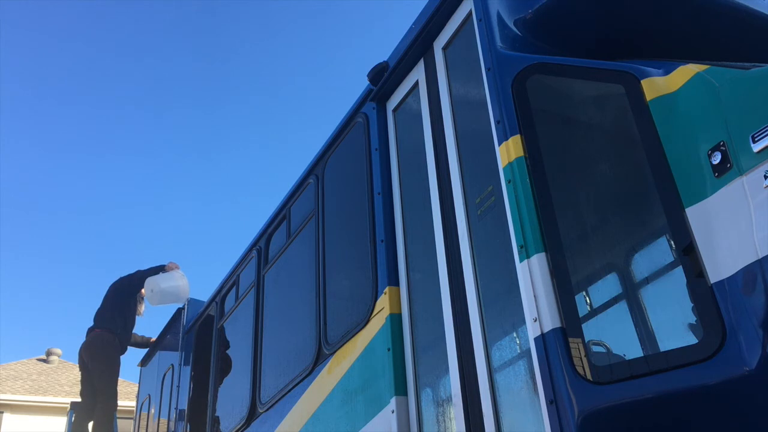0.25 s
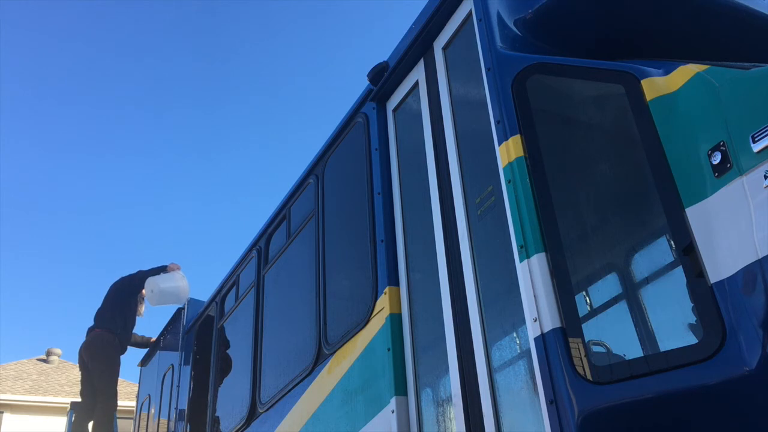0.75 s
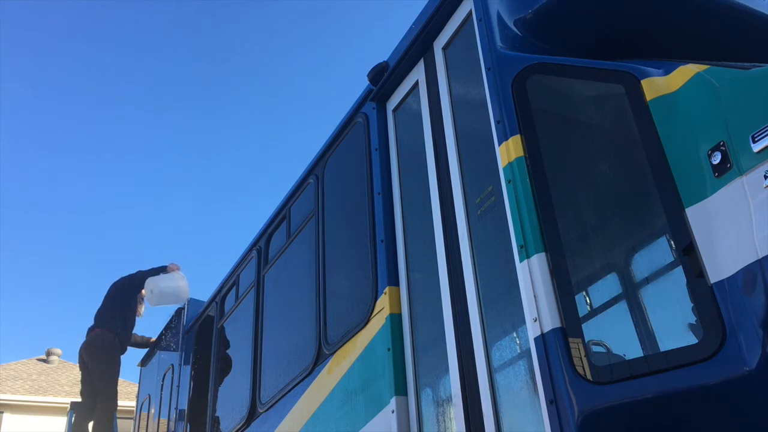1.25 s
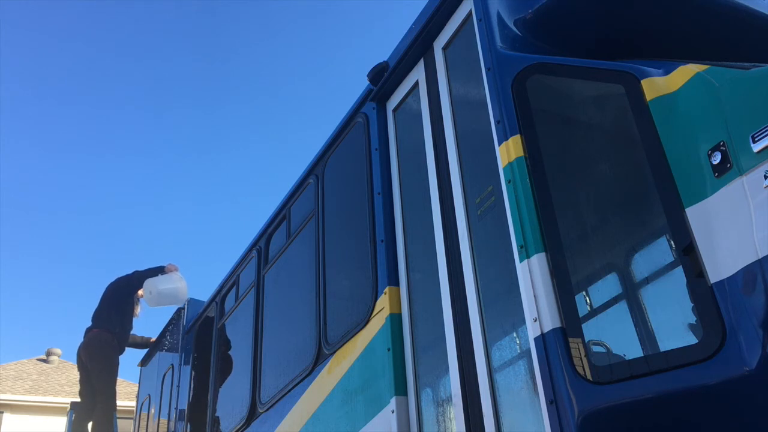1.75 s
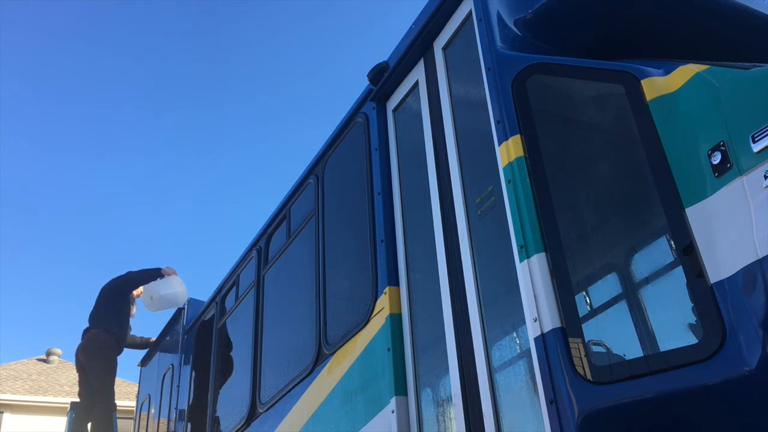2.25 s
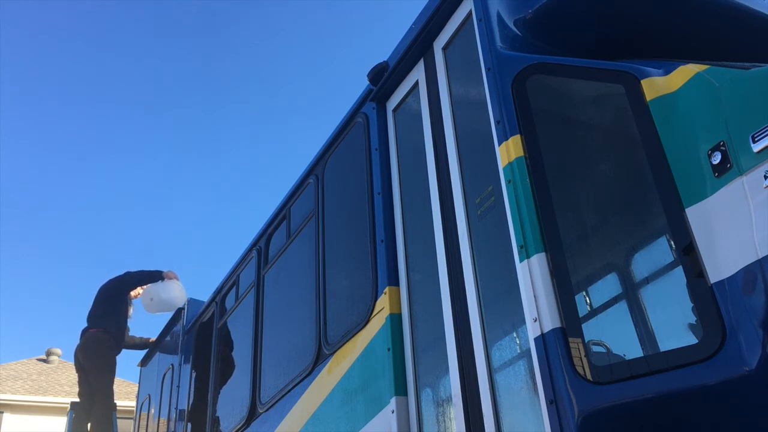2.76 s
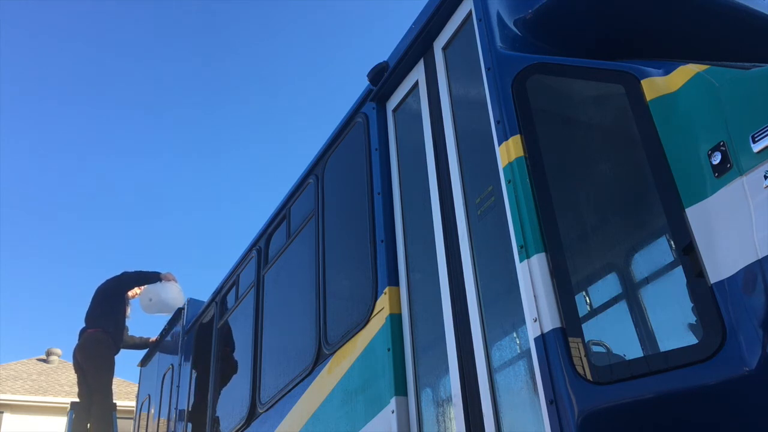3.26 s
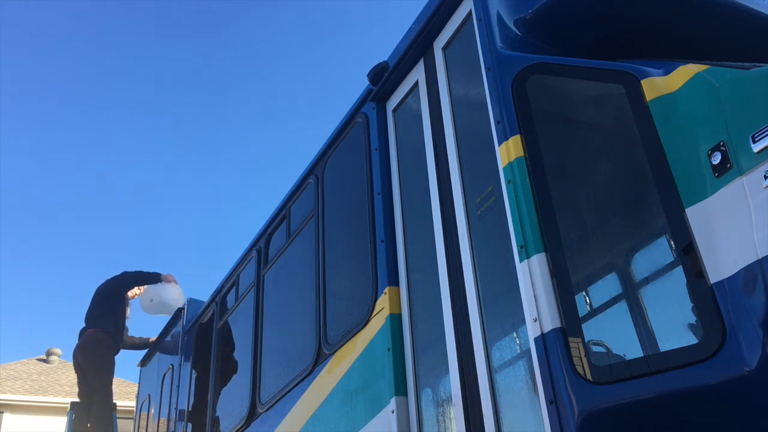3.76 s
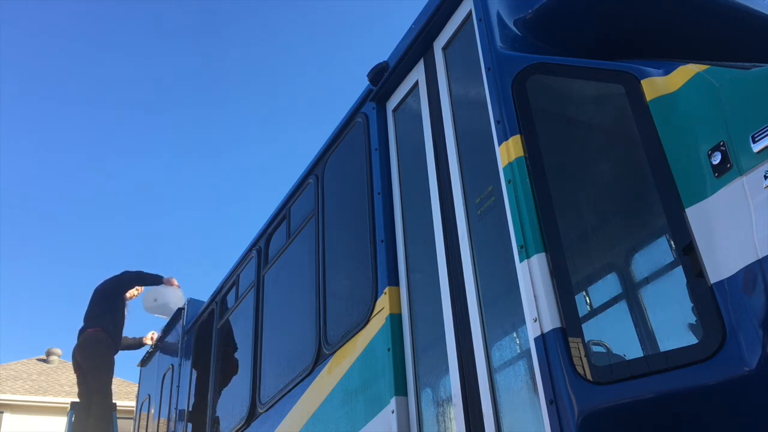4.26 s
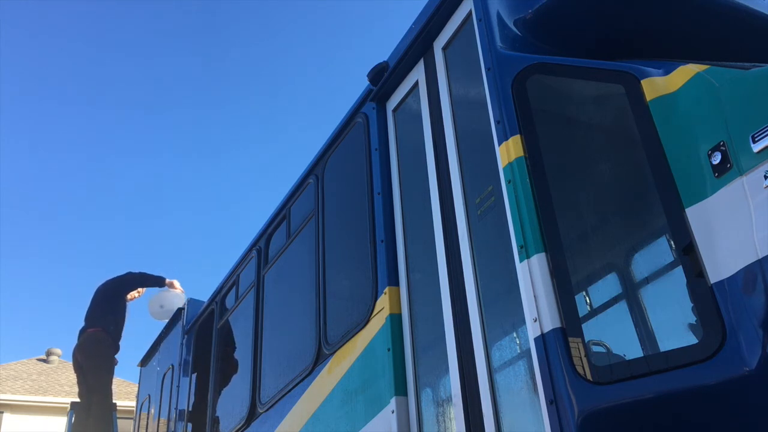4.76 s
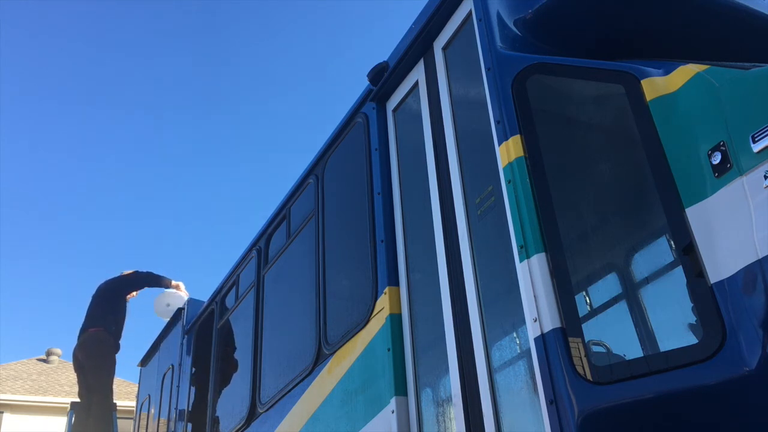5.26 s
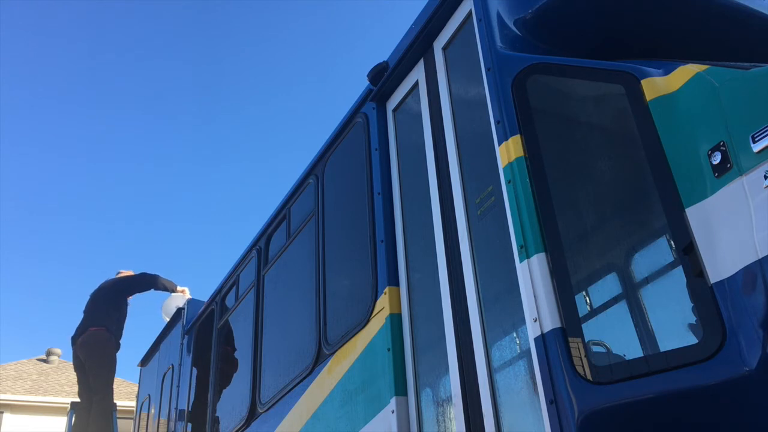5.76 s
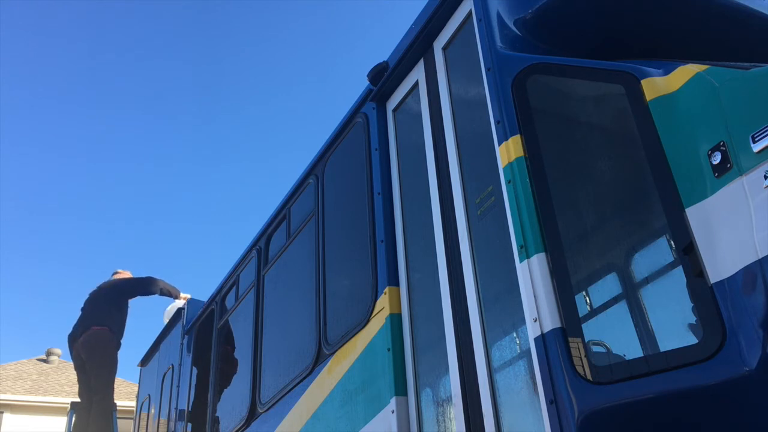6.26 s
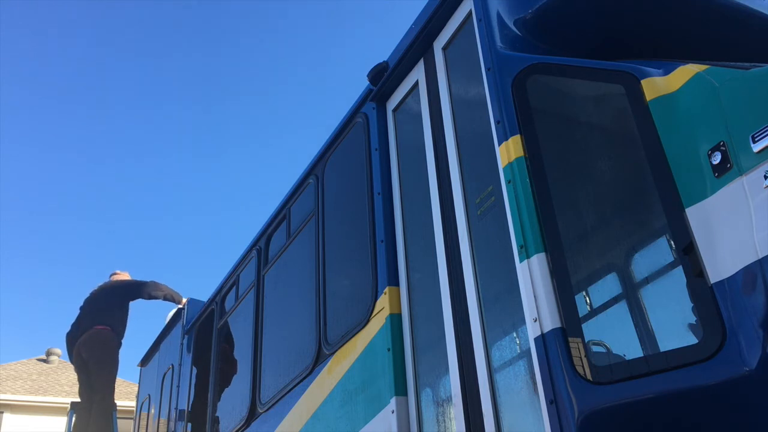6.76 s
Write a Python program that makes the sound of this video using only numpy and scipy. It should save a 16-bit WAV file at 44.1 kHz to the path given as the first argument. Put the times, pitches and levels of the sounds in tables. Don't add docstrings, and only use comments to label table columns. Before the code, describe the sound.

A quiet yard with low distant traffic hum and faint steady air hiss. From 0 to 1.2 s only small, crisp water drips tick irregularly close by, with a very faint sparrow chirp at 0.75. At 1.3 a small splash slaps sheet metal; from 1.7 to 2.4 a fuller throw lands as uneven slaps, with short metallic rings, patter and bright fizz, a soft chirp at its start. It thins to scattered ticking drips and a chirp near 3.1. At 3.8 one hard, loudest slap cracks on the roof, followed by smaller gobs until 4.0. Drips and tiny bubble plinks continue. From 4.65 to 5.2 the last water tumbles out in a rapid cluster, pattering and gurgling, then drains quickly. Two sharp high ticks come around 5.3, then sparse drips, with faint warbled chirps at 5.7 and 6.15. Echoes are short and dull.

```python
import sys
import numpy as np
from scipy import signal
from scipy.fft import rfft, irfft
from scipy.io import wavfile
from scipy.ndimage import uniform_filter1d

SR = 44100
rng = np.random.default_rng(int(sys.argv[2]) if len(sys.argv) > 2 else 0)


def file_out(sig):
    cols = np.atleast_2d(sig).T
    lim = np.clip(cols, -1, 1)
    pcm = np.round(lim * 32767).astype(np.int16)
    wavfile.write(sys.argv[1], SR, pcm)


def gain_from_db(level_db):
    decades = np.asarray(level_db, float) / 20
    return 10 ** decades


N = 308700

# [t/s, peak level/dB, tick colour f/Hz, panel ring re peak/dB, bright spit re peak/dB]
THROWN_GOBS = [(1.293, -25.5, 3000, -8, 4), (1.3928, -40, 5840, -18, 0), (1.723, -27.5, 2430, 1.5, 5.5),
               (1.7638, -37.5, 2970, -8, -27), (1.8158, -35.5, 2800, 3, 7), (1.885, -45, 3380, 5, -16),
               (1.927, -24, 2020, -1, 0.5), (1.9713, -28, 3280, -5, -19), (2.0655, -35.5, 2430, 4.5, 2),
               (2.084, -33, 3020, 10, 1), (2.098, -50, 2960, -9.5, -20), (2.2801, -27, 3140, -1.5, -3),
               (2.3044, -30.5, 3630, -6.5, 1), (2.3589, -35.5, 2230, -17, -4),
               (3.774, -44.5, 3120, -0.5, -1), (3.8303, -15, 1970, 0, 0), (3.8796, -24, 3120, -15, -23),
               (3.9342, -34, 3930, -2.5, -1), (3.9866, -34.5, 3000, -1.5, 0), (4.0023, -36, 3000, 0, -14)]
# [t/s, peak level/dB, tick colour f/Hz, panel ring re peak/dB, bright spit re peak/dB]
LAST_GOBS = [(4.666, -34.5, 4360, -5, -15), (4.7076, -38.5, 3200, -9.5, -5),
             (4.7376, -33.5, 5230, -9.5, -3), (4.7814, -35.5, 2120, 8.5, 8), (4.812, -26, 6380, -21, -19),
             (4.8289, -24, 3120, -2, -26), (4.8448, -36, 3080, 4, -14), (4.8748, -24, 5740, -7, -23),
             (4.9338, -33.5, 6600, -1.5, -13), (5.0289, -32.5, 4300, -9, -2), (5.0858, -38, 2800, -6.5, -9),
             (5.1092, -28, 3120, -2, -8), (5.1415, -34, 3140, -6.5, -12), (5.1696, -49.5, 2110, 6, -8)]


def rms_one(x):
    return x / np.sqrt(np.mean(x ** 2) + 1e-20)


def at_hz(points, hz):
    point_hz, point_db = np.transpose(points)
    return np.interp(np.log(hz), np.log(point_hz), point_db)


def coloured(x, spectrum):
    hz = np.fft.rfftfreq(N, 1 / SR) + 1
    return rms_one(irfft(rfft(x) * gain_from_db(at_hz(spectrum, hz)), N))


def band(x, low_hz, high_hz):
    edges = np.clip([low_hz, high_hz], 20, .45 * SR)
    return signal.sosfilt(signal.butter(2, edges, "band", fs=SR, output="sos"), x)


def ring(clicks, hz, t60):
    decay = gain_from_db(-60 / (t60 * SR))
    turn = 2 * np.pi * hz / SR
    return signal.lfilter([0, np.sin(turn)], [1, -2 * decay * np.cos(turn), decay * decay], clicks + 1e-18)


def droplets(per_s, spread_db):
    sizes = gain_from_db(spread_db * np.minimum(rng.exponential(1, N), 5)) * rng.choice([-1, 1], N)
    return sizes * (rng.random(N) < per_s / SR)


def burst(t60, rise_s):
    t = np.arange(2048) / SR
    snap = 1 + 1.4 * np.exp(-t / 0.0005)
    fade = gain_from_db(-60 * t / t60) * (1 - np.exp(-t / rise_s))
    return rng.standard_normal(len(t)) * snap * fade + 6.25 * (t == 0)


def impacts():
    # [t/s, peak level/dB, tick colour f/Hz]
    run_off_drips = [(0.2768, -42.5, 4360), (0.6539, -37, 3020), (0.7971, -38.5, 4420), (1.2653, -40.5, 4180),
                     (1.5686, -35.5, 2970), (1.6404, -61, 3080), (1.7756, -25, 3850), (2.2007, -38, 3200),
                     (2.219, -36.5, 4350), (2.5479, -30.5, 3800), (2.5748, -35, 4500), (2.7272, -44.5, 3260),
                     (2.754, -53, 2070), (3.436, -47, 2530), (2.801, -30, 4100), (2.9058, -45.5, 4140),
                     (2.9635, -47.5, 4100), (3.0595, -42.5, 4530), (3.088, -36.5, 3740), (3.2949, -40.5, 3870),
                     (3.586, -42, 3670), (4.2856, -36.5, 4300), (4.354, -39.5, 3960), (4.4248, -53, 2700),
                     (5.0055, -34, 2360), (5.4935, -35.5, 2670), (5.5629, -40.5, 3760), (5.892, -39, 3450),
                     (6.0807, -51, 2740), (6.2843, -45.5, 3260),
                     (0.0181, -43.5, 5570), (0.1572, -38.5, 4800), (0.184, -37.5, 4700), (0.3594, -43, 5440),
                   (0.532, -49, 6840), (0.586, -42, 5700), (0.6739, -41, 6450), (0.6886, -40.5, 6000),
                   (0.8776, -43, 5970), (0.9268, -45, 6350), (1.5332, -46.5, 6060), (1.5988, -42, 5940),
                   (2.4646, -46, 6780), (2.627, -41, 4500), (2.7807, -47, 5630), (2.907, -38.5, 6960),
                   (3.4302, -42, 6200), (3.686, -48, 6350), (4.1529, -42.5, 6250), (4.2247, -49, 6450),
                   (4.299, -55, 6040), (4.3273, -36, 4800), (4.4714, -42, 5500), (4.5946, -52, 5850),
                   (5.0449, -32.5, 5370), (5.372, -38.5, 5500), (5.9615, -44, 5600), (6.3732, -37.5, 7140),
                   (6.4433, -46.5, 6910), (6.55, -39.5, 4660)]
    # [t/s, peak level/dB]
    beads = [(0.0014, -43.5), (0.3124, -41), (0.455, -49), (0.496, -56), (0.621, -45), (0.998, -43),
             (1.5503, -44), (2.5282, -42.5), (3.154, -38.5), (3.3318, -44), (3.483, -44), (4.1279, -45),
             (5.272, -23), (5.3289, -34), (5.3531, -24), (5.4616, -43.5), (5.8377, -43.5), (5.924, -58.5),
             (6.2223, -52), (6.6336, -58)]
    bead_hz, bead_spit_db = 8520, 2
    ring_db = -34
    drips = [(*row, 0) for row in run_off_drips]
    drips += [(s, db, bead_hz, bead_spit_db) for s, db in beads]
    out = THROWN_GOBS + LAST_GOBS
    for s, db, hz, extra_db in drips:
        spit_db = -14.5 + extra_db - 1.6 * (db + 46.5)
        out = out + [(s, db, hz, ring_db, spit_db)]
    return out


def panel(patter_gain, gurgle_gain):
    # [f/Hz, level/dB, t60/s]
    panel_modes = [(346, -33.5, 0.3), (470, -38, .05), (624, -32, 0.058), (720, -29, 0.02), (817, -19, 0.3),
                   (866, -11, 0.23), (884, -17, 0.3), (976, -22.5, 0.89), (1066, -12, 0.1),
                   (1176, -1.5, 0.063), (1248, -0.5, 0.055), (1331, -3.5, 0.15), (1320, -10.5, 0.033),
                   (1400, -1, 0.088), (1520, -8.5, 0.027), (1533, -6.5, 0.068), (1656, -5.5, 0.072),
                   (1617, -7, 0.12), (1830, -12, .08), (2025, -8, 0.035), (1970, -22, 0.18),
                   (2430, -17.5, 0.16), (2790, -19, 0.23), (2900, -19, .05), (3120, -5.5, .05),
                   (3140, -17, .05), (3486, -13.5, 0.13), (3780, -25, .06), (4300, -17, 0.036),
                   (4800, -26, 0.021)]
    hits = impacts()
    t = np.arange(3584) / SR
    slaps, patter = np.zeros(N + len(t)), np.zeros((2, N))

    hz, level_db, t60 = np.transpose(panel_modes)[:, :, None]
    luck = rng.standard_normal((len(hits), 3, len(panel_modes), 1))
    for (s, peak_db, _, ring_db, _), (lag, strength, detune) in zip(hits, luck):
        since = np.maximum(t - np.abs(lag) * .0025, 0)
        wave = np.sin(2 * np.pi * hz * (1 + 0.0072 * detune) * since)
        modes = gain_from_db(level_db + 2.3 * strength - 60 * since / t60) * wave
        blow = (np.sign(lag) * modes).sum(axis=0)
        i = round(s * SR)
        slaps[i:i + len(t)] += gain_from_db(peak_db + ring_db + 2.5) * blow / np.abs(blow).max()
    slaps = band(slaps, 1100, 8600)

    clumps = gain_from_db(1.3 * rms_one(uniform_filter1d(rng.standard_normal(N), size=700)))
    for hz, level_db, t60 in panel_modes:
        struck = ring(clumps * droplets(per_s=2400.0, spread_db=1.5), hz, 0.3 * t60) / np.sqrt(t60)
        patter[int(hz < 750)] += gain_from_db(level_db) * struck
    high_patter, low_gurgle = rms_one(patter[0]), rms_one(patter[1])
    return slaps[:N] + patter_gain * high_patter + gain_from_db(-2.5) * gurgle_gain * low_gurgle


def sheets():
    rise_s, t60_s = .012, 0.33
    t, starts = np.arange(SR // 2) / SR, np.zeros(N)
    for s, peak_db, _, ring_db, _ in THROWN_GOBS + LAST_GOBS:
        starts[round(s * SR)] = gain_from_db(peak_db + ring_db)
    spreading = (1 - np.exp(-t / rise_s)) * gain_from_db(-60 * t / t60_s)
    return signal.fftconvolve(starts, spreading)[:N]


def ticks():
    out, t = np.zeros(N + 4096), np.arange(2048) / SR
    for s, peak_db, hz, ring_db, bright_db in impacts():
        mass = np.clip((peak_db + 53) / 25, 0, 1) * np.clip((ring_db + 22.5) / 14, 0, 1)
        tick = band(burst(0.0056 + 0.096 * mass, .0001), hz / 1.48, hz * 1.54 + 3500 * mass)
        tick = band(tick, hz / 2.4, 15000)
        spit = band(burst(.006 + 0.045 * mass, .0001), 7000, 14230)
        bubble = np.sin(2 * np.pi * hz * (t + 40 * t * t)) * gain_from_db(-60 * t * hz / 20 - 14)
        sound = tick / np.abs(tick).max() + gain_from_db(bright_db) * spit / np.abs(spit).max() + bubble

        landings = rng.standard_normal(len(t)) * (rng.random(len(t)) < .004) * gain_from_db(-60 * t / 0.06)
        satellites = np.convolve(landings, sound[:256])[:len(t)]
        i = round(s * SR)
        out[i:i + len(t)] += gain_from_db(peak_db - 2.5) * (sound + gain_from_db(-6.5) * satellites)
    return out[:N]


def pour_gains():
    # [t/s, level/dB]
    pours = [
        [(1.28, -62), (1.32, -54), (1.44, -73), (1.5, -68)],
        [(1.71, -57), (1.774, -51.5), (1.896, -48.5), (1.946, -47.5), (2.06, -58.5)],
        [(2.06, -61), (2.186, -58.5), (2.27, -64)],
        [(2.27, -45), (2.316, -54), (2.5, -73)],
        [(3.76, -75), (3.816, -70), (3.956, -56), (4.144, -66), (4.22, -70)],
        [(4.64, -73), (4.718, -51), (4.838, -46), (4.93, -47.5), (5.02, -52)],
        [(5.02, -47), (5.208, -70.5), (5.3, -65)],
    ]
    t, out = np.arange(N) / SR, np.zeros((3, N))
    usual_db = -55
    layers = [(-4.5, 1.3, 0),
              (-7, 0.8, 0),
              (-12, .7, .02)]
    for rows in pours:
        s, db = np.transpose(rows)
        fade = np.clip(np.minimum(t - s[0], s[-1] - t) / .02, 0, 1)
        for k, (level, follows, lag) in enumerate(layers):
            swing_db = np.interp(t - lag, s, db) - usual_db
            out[k] += fade * gain_from_db(level + usual_db + follows * swing_db)
    return out


def fizz(per_s, cycles, spread_db, low_hz):
    # [f/Hz, level per Hz/dB]
    spray_colour = [(1180, -20.5), (2000, -6.5), (2550, -31), (3060, 1.5), (4770, -5.5), (6090, -11),
                    (13200, -9), (16000, -46.5)]
    grains, dealt = droplets(per_s, spread_db), rng.integers(0, 20, N)
    out = np.zeros(N)
    for k, hz in enumerate(np.geomspace(low_hz, 15500, 20)):
        level = gain_from_db(at_hz(spray_colour, hz)) * np.sqrt(hz)
        out += level * ring(grains * (dealt == k), hz, cycles / hz)
    return rms_one(out)


def spray(gain):
    drain_s, dry_db, wet_db = 0.23, -84, -24.5
    keep = np.exp(-1 / (drain_s * SR))
    run_off = signal.lfilter([1 - keep], [1, -keep], gain)
    trickle = gain_from_db(dry_db) + gain_from_db(wet_db) * run_off * 10
    gobs = gain_from_db(5.8 * rms_one(uniform_filter1d(rng.standard_normal(N), size=500)))
    poured = gobs * fizz(per_s=3500.0, cycles=52.0, spread_db=2.0, low_hz=2200)
    return gain * poured + trickle * fizz(per_s=1700.0, cycles=7, spread_db=4., low_hz=6500)


def plinks():
    # [t/s, peak level/dB, f/Hz]
    bubbles = [(.465, -56, 650), (3.248, -61, 2200), (3.817, -46, 2900), (4.386, -57, 1390),
               (4.424, -59, 2790), (4.437, -47, 5400), (4.505, -56, 1360), (4.662, -46, 600),
               (4.715, -47, 522), (1.305, -48, 714), (2.11, -44, 597), (2.14, -48, 593), (3.95, -58, 620),
               (4.01, -47, 600), (4.09, -56, 596), (4.84, -39, 925), (6.024, -57, 1880),
               (6.069, -56.5, 3120), (5.53, -86, 2080), (1.284, -45, 1330)]
    out, t = np.zeros(N), np.arange(2048) / SR
    for s, peak_db, hz in bubbles:
        i = round(s * SR)
        swell = np.clip(t / 0.0014, 0, 1) * gain_from_db(-60 * t * hz / 45)
        out[i:i + len(t)] += gain_from_db(peak_db) * swell * np.sin(2 * np.pi * hz * (t + hz / 400 * t * t))
    return out


def sparrow():
    # [t/s, f/Hz, level/dB]
    phrase = [
        (0, 5200, 4),
        (.008, 4300, 5),
        (.031, 3300, 7.5),
        (.041, 3586, 2),
        (.048, 2710, -12),
        (.055, 3126, 1),
        (.072, 2980, 8),
        (0.081, 3774, 7.5),
        (0.097, 2610, 3),
    ]
    # [t of top/s, level/dB, time stretch/ratio, height of the leap/ratio, lead-in level/dB]
    chirps = [
        (.746, -72, 1.06, .55, -3),
        (1.705, -64, 1.4, 0.72, -2),
        (3.101, -62.5, 1.01, 0.62, -14),
        (5.74, -62, .99, 1.0, -2),
        (6.163, -64, 0.99, 1, -2.5),
    ]
    lead_s, lead_hz, lead_level_db, leap_s = 0.036, 3200, -16, .018
    octave_db, octave_fade_s = -5, 0.02
    out = np.zeros(N)
    s, hz, db = np.transpose([(-leap_s, lead_hz, 0)] + phrase)
    for top, level_db, stretch, swing, lead_db in chirps:
        start = top + (s[0] - lead_s) * stretch
        i = np.arange(round(start * SR), round((top + s[-1] * stretch) * SR))
        t = (i / SR - top) / stretch
        glide = uniform_filter1d(np.interp(t, s, hz), size=100)
        glide = glide + (swing - 1) * (glide - 3700).clip(0)
        wobble = rms_one(uniform_filter1d(rng.standard_normal(len(i)), size=220))
        flutter = rms_one(uniform_filter1d(rng.standard_normal(len(i)), size=70))
        phase = 2 * np.pi * np.cumsum(glide * (1 + 0.0198 * wobble)) / SR
        octave = gain_from_db(octave_db - np.clip(60 * (t - s[0]) / octave_fade_s, 0, 28))
        voice = np.sin(phase) + octave * np.sin(2 * phase)
        lead = lead_level_db * ((s[0] - t).clip(0) / 0.044) ** 2 + lead_db * np.clip(-t / .006, 0, 1)
        out[i] += gain_from_db(level_db + np.interp(t, s, db) + lead + 3.6 * flutter) * voice
    return out + gain_from_db(-9.0) * np.roll(out, round(0.0076 * SR))


def echoes(x, t60, level_db, dull):
    t = np.arange(round(.4 * SR)) / SR
    tail = rng.standard_normal(len(t)) * gain_from_db(-60 * t / t60) * np.clip(t / 0.0032, 0, 1)
    tail = signal.lfilter([1 - dull], [1, -np.clip(dull, 0, .9)], tail / np.linalg.norm(tail))
    return x + gain_from_db(level_db) * signal.fftconvolve(x, tail)[:N]


def yard():
    # [f/Hz, level per Hz/dB]
    yard_colour = [(18, -39), (32, -7), (59, 0.5), (121, 0.5), (170, -12), (355, -21), (461, -29),
                   (800, -33), (1900, -42.5), (2800, -49.5), (4500, -50), (8000, -54.5), (12000, -48),
                   (16000, -61)]
    noise = gain_from_db(-55 + 6) * coloured(rng.standard_normal(N), yard_colour)
    low = signal.sosfilt(signal.butter(1, 300, fs=SR, output="sos"), noise)
    swell = rms_one(uniform_filter1d(rng.standard_normal(N), size=20000))
    traffic_gain = gain_from_db(-8 + 1.55 * swell)
    return noise + low * (traffic_gain - 1)


def scene():
    panel_gain, spray_gain, gurgle_gain = pour_gains()
    sheet = sheets()
    wet = panel(panel_gain + gain_from_db(-24.5) * sheet, gurgle_gain + gain_from_db(-31) * sheet)
    roof = echoes(wet + spray(spray_gain), t60=0.31, level_db=-6.5, dull=0.92)
    drips = echoes(ticks(), t60=0.34, level_db=2.9, dull=0.74)
    bird = echoes(sparrow(), t60=0.41, level_db=-11, dull=0.3)
    return (roof + drips + plinks() + bird + yard())[None]


def roll_off(x):
    return signal.sosfilt(signal.butter(12, 16620, fs=SR, output="sos"), x)


def record(dry):
    notch = signal.iirnotch(10500, 6, fs=SR)
    x = dry + .5 * (signal.lfilter(*notch, dry) - dry)
    x = signal.sosfilt(signal.cheby2(12, 50, 16300, fs=SR, output="sos"), x)
    x = signal.sosfilt(signal.butter(4, 33, "high", fs=SR, output="sos"), x)
    return roll_off(x)


dry = scene()
out = record(dry)
file_out(out)
```